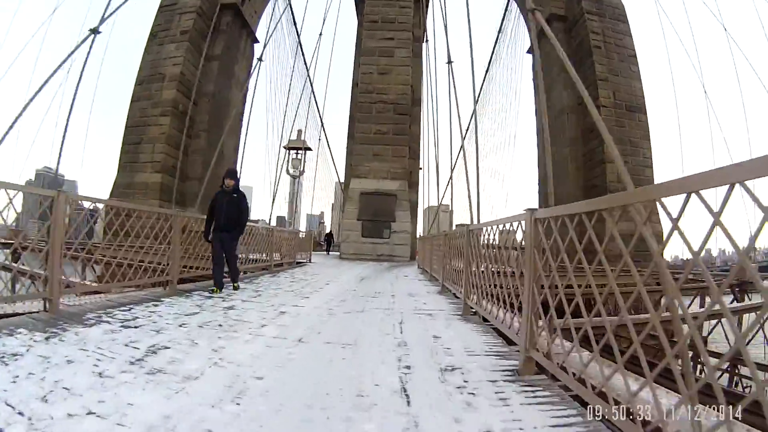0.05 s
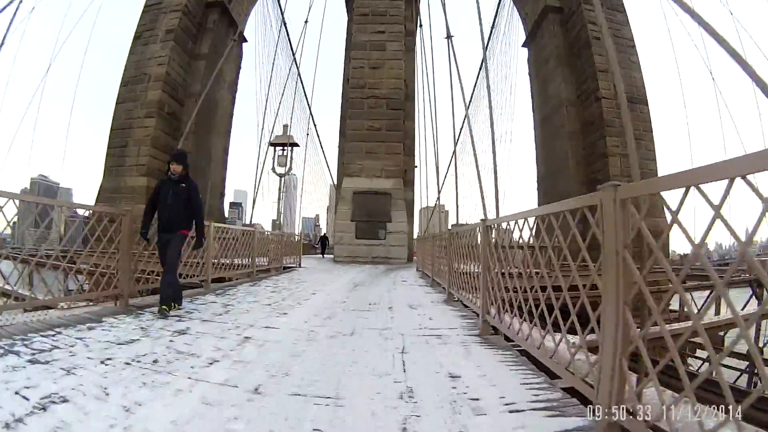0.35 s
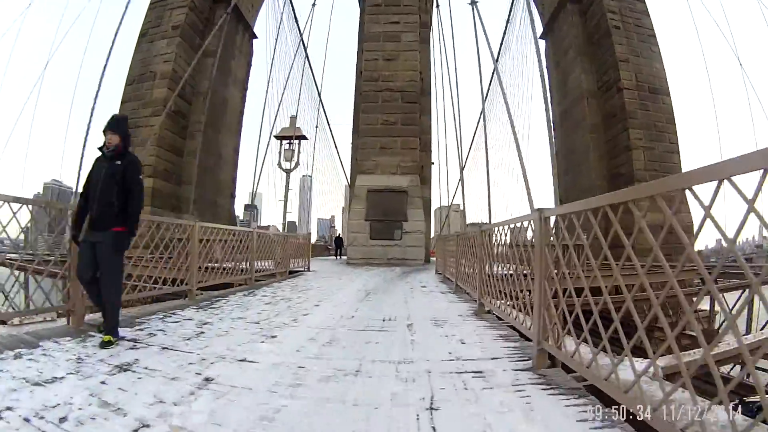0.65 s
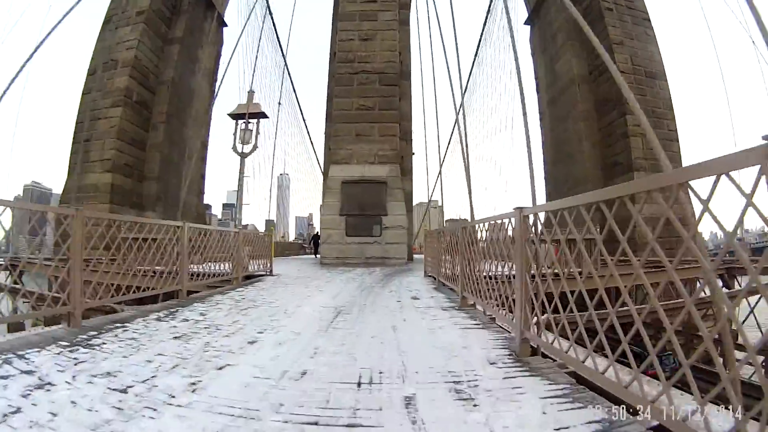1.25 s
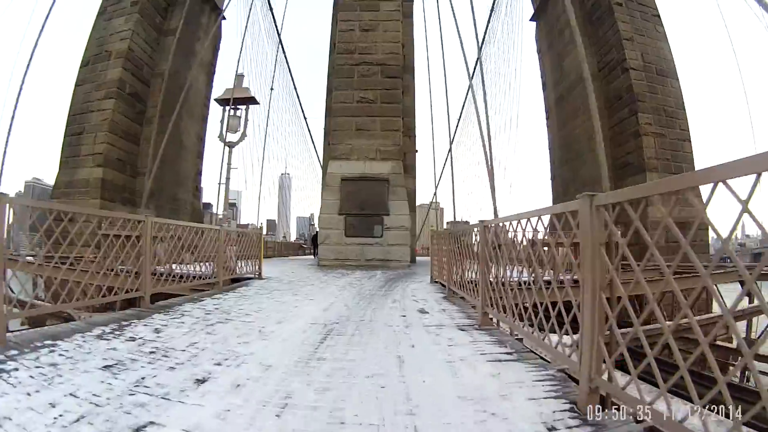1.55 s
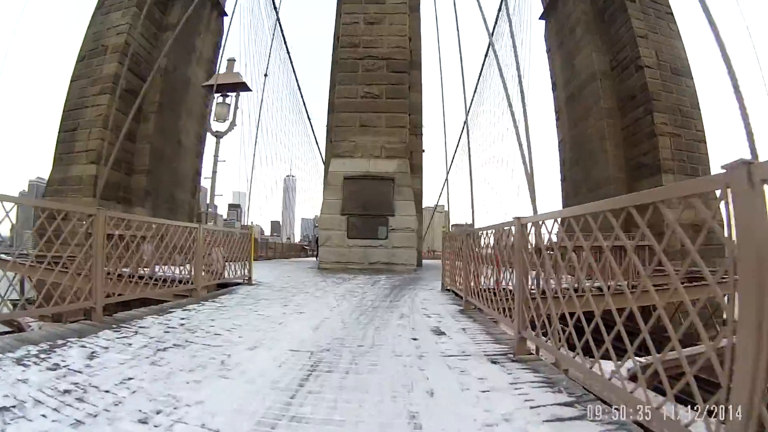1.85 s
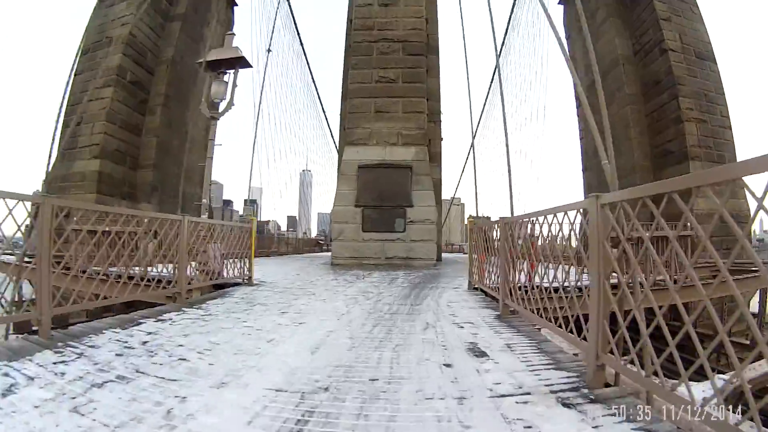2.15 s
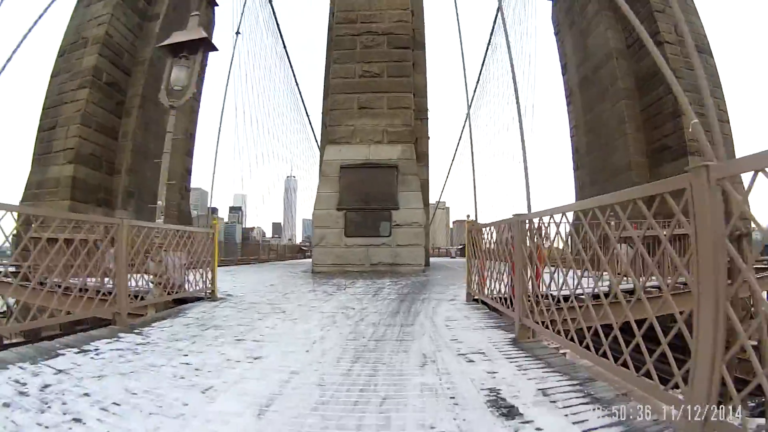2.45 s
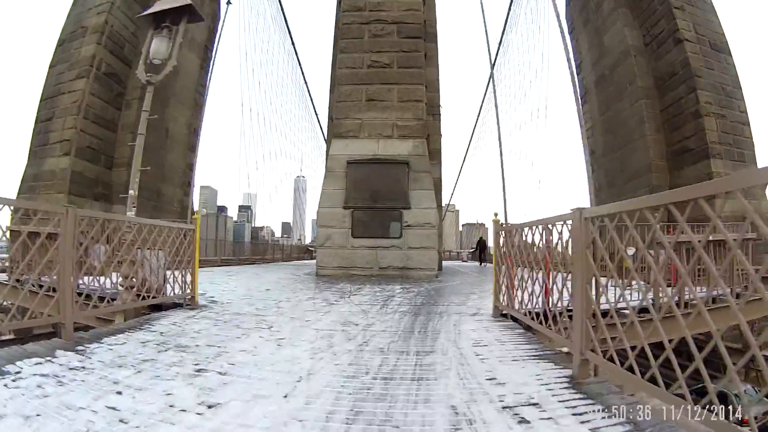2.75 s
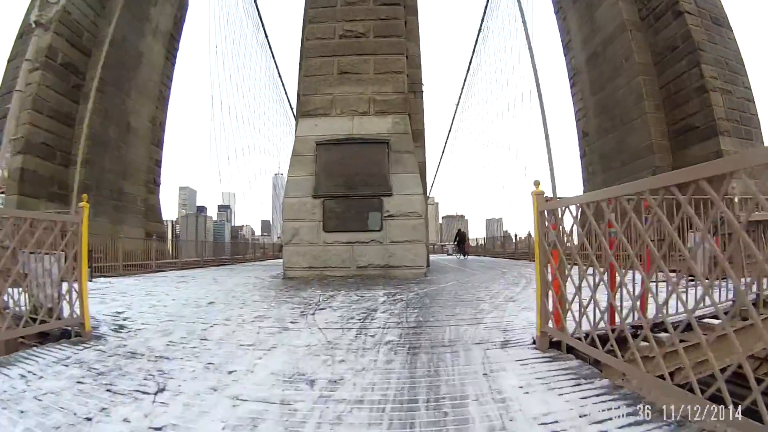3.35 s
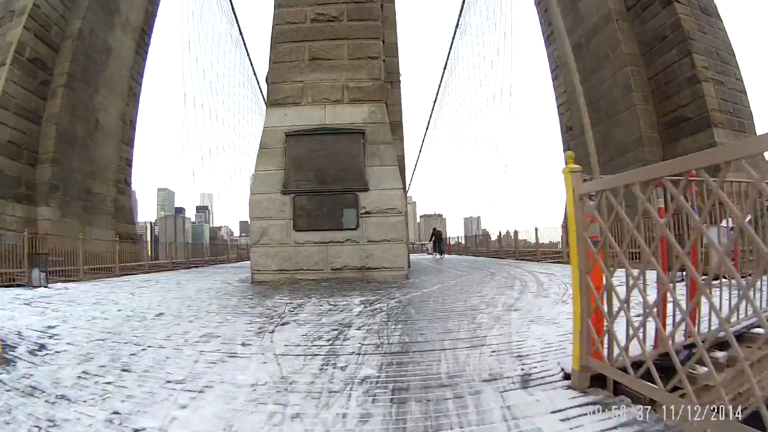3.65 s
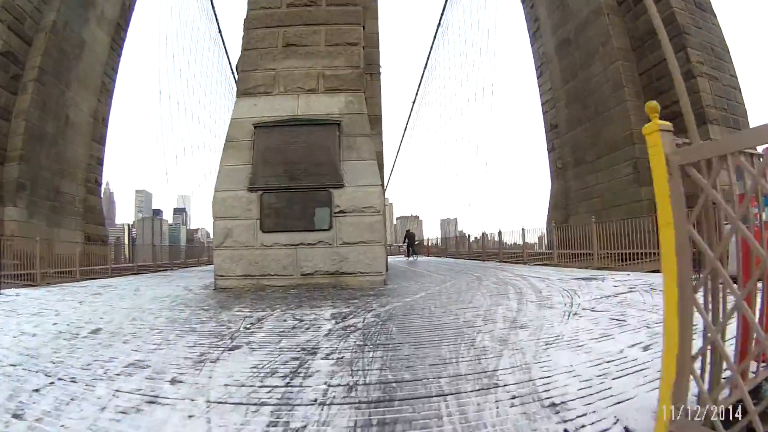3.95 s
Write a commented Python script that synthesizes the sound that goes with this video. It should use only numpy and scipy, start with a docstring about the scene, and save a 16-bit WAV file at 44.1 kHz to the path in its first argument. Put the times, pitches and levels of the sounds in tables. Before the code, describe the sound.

A bicycle rolls over a snowy plank walkway with a low, uneven drone, dull tyre hiss and faint snow ticks. Wind buffets the microphone on the bike twice, with dry pops, sputters and deep thuds.

```python
"""On a snowy plank walkway, a bicycle rolls along with a camera on it.
The planks force the frame to vibrate, and it drones in a few low resonances.
The tyres hiss, and the snow crunches and ticks faintly as it breaks under them.
Turbulence at the microphone makes a deep thud, short sputters, dry pops and two buffeting gusts."""
import sys
import numpy as np
from scipy import signal
from scipy.fft import rfft, irfft
from scipy.io import wavfile
from scipy.ndimage import uniform_filter1d

SR = 44100
rng = np.random.default_rng(int(sys.argv[2]) if len(sys.argv) > 2 else 0)


def generate_wav(signal):
    """Clip the signal to [-1, 1] and save it as 16-bit WAV at the path in sys.argv[1]."""
    frames = np.transpose(np.atleast_2d(signal))
    scaled = np.clip(frames, -1, 1) * 32767
    pcm = np.round(scaled).astype(np.int16)
    wavfile.write(sys.argv[1], SR, pcm)


N = 176400


def amp(db):
    """Decibels to amplitude ratio."""
    return 10 ** (np.asarray(db) / 20)


def unit(x):
    """Normalisation to rms 1."""
    return x / np.sqrt(np.mean(x ** 2) + 1e-20)


def curve(points):
    """Linear interpolation between (time_s, value) points."""
    return np.interp(np.arange(N) / SR, *np.transpose(points))


def colour(x, spectrum):
    """Spectral shaping by (frequency_hz, gain_db) points; rms 1."""
    points_hz, db = np.transpose(spectrum)
    hz = np.fft.rfftfreq(len(x), 1 / SR)
    gain = amp(np.interp(np.log(hz + 1), np.log(points_hz), db))
    return unit(irfft(rfft(x) * gain, len(x)))


def drift(rate_hz):
    """Random modulation: low-passed noise of rms 1."""
    hz = np.fft.rfftfreq(N, 1 / SR)
    return unit(irfft(rfft(rng.standard_normal(N)) * np.exp(-(hz / rate_hz) ** 2), N))


def clicks(per_s, spread_db):
    """A Poisson process: independent impulses of uneven size and sign."""
    impulses = (rng.random(N) < per_s / SR) * rng.choice([-1, 1], N)
    return impulses * amp(spread_db * np.minimum(rng.exponential(1, N), 3))


def add(mix, s, sound):
    """Superposition of a sound on the mix, centred on a time."""
    part = mix[max(round(s * SR) - len(sound) // 2, 0):][:len(sound)]
    part += sound[:len(part)]


def air_band(hz, centre_hz, low_slope, high_slope, top_hz):
    """The broad spectrum of a pressure pulse: two power-law skirts and a steep upper limit."""
    ratio = hz / (1.126 * centre_hz)
    return ratio ** low_slope / (1 + ratio ** (low_slope + high_slope)) / (1 + (hz / top_hz) ** 10)


# Modes of the frame and camera mount: pitch_hz, width_hz, gain_db
FRAME_MODES = [(45.7, 39, -23.5), (70.7, 4, -15.5), (82.2, 6, -10), (118.4, 7.4, -1), (138.8, 15.6, -6.5),
               (221.5, 21.4, -16.5)]
# How hard the planks shake the frame: time_s, level_db
PLANK_DRIVE = [(0.0, -33.5), (0.07, -37), (0.19, -40), (0.21, -36.5), (0.29, -39), (0.36, -35.5),
               (0.46, -35.5), (0.6, -44.5), (0.69, -35.5), (0.78, -41.5), (0.85, -36), (0.92, -38.5),
               (1.07, -39.5), (1.24, -44), (1.27, -37), (1.31, -46), (1.37, -36.5), (1.43, -41),
               (1.45, -38), (1.69, -36.5), (1.71, -43), (1.78, -37), (1.82, -41.5), (1.84, -38.5),
               (2.14, -38.5), (2.21, -48), (2.23, -40), (2.29, -44), (2.32, -35), (2.37, -37), (2.42, -47),
               (2.55, -39.5), (2.58, -37), (2.7, -42), (2.75, -34), (2.82, -48), (2.85, -31), (2.9, -41.5),
               (2.95, -33), (3.0, -41), (3.02, -58), (3.04, -34.5), (3.11, -49), (3.14, -35), (3.16, -41.5),
               (3.29, -37), (3.42, -50), (3.49, -37), (3.58, -39.5), (3.6, -48), (3.71, -36), (3.78, -45),
               (3.8, -36.5), (3.9, -41.5), (3.92, -41.5), (4.0, -34.5)]


def frame(steadiness=0.35):
    """Forced vibration: the planks drive the frame at random, and it responds in its modes."""
    hz, drone = np.fft.fftfreq(N, 1 / SR), np.zeros(N)
    for pitch_hz, width_hz, db in FRAME_MODES:
        detuning = (hz - pitch_hz) / width_hz * 1.075
        ring = np.fft.ifft(np.fft.fft(rng.standard_normal(N)) / (1 + detuning ** 2))
        power = uniform_filter1d(abs(ring) ** 2, size=2000)
        drone += amp(db) * unit(ring.real / power ** steadiness)  # evens out each mode's strength
    return drone * amp(curve(PLANK_DRIVE))


# Spectra of the rolling noise and of the snow's crunch: frequency_hz, gain_db
ROLL_SPECTRUM = [(15, -23.5), (40, -8.5), (100, 1.5), (180, 0.5), (290, 0.5), (450, -6.5), (700, -13.5),
                 (1100, -17.5), (1800, -24), (2600, -31.5), (3500, -39), (3800, -36.5), (4050, -45.5),
                 (5000, -45), (9000, -55.5)]
CRUNCH_SPECTRUM = [(1500, -22.5), (3000, -6.5), (3800, 2.5), (4600, 1.5), (5400, -9), (6250, 1.5),
                   (6800, -18), (7500, 3.5), (8400, -3), (9300, -10.5), (10500, -17.5), (12000, -13.5),
                   (14000, -17.5)]
# Envelopes of the same two sounds: time_s, gain_db
ROLL_ENVELOPE = [(0, 0.5), (.45, -1), (.62, -1), (1.0, -1), (1.4, 0), (2.0, -1.5), (2.6, -2), (3.2, -0.5),
                 (3.6, -1), (4, -2)]
CRUNCH_ENVELOPE = [(0, -72), (.12, -81), (.23, -82), (.36, -87.5), (.55, -83), (.67, -82.5), (.9, -82),
                   (1.0, -76.5), (1.11, -81), (1.2, -85.5), (1.36, -83), (1.62, -86), (1.78, -83.5),
                   (1.87, -82), (1.97, -79.5), (2.1, -81.5), (2.19, -99), (2.45, -83.5), (2.6, -80),
                   (2.77, -80), (2.86, -90), (3.11, -88), (3.17, -78), (3.30, -79), (3.42, -91), (4, -83.5)]


def tyres(roll_db=-49, crunch_db=-0.5):
    """Contact noise: the tread rolls with a dull, lumpy hiss and crushes small clumps of snow."""
    lumps = amp(1.46 * drift(rate_hz=49))
    roll = colour(rng.standard_normal(N) * lumps, ROLL_SPECTRUM)
    clumps = signal.oaconvolve(abs(clicks(per_s=61, spread_db=-0.5)), np.hanning(230))[:N]
    crunch = colour(rng.standard_normal(N) * (.2 + clumps), CRUNCH_SPECTRUM)
    return roll * amp(roll_db + curve(ROLL_ENVELOPE)) + crunch * amp(crunch_db + curve(CRUNCH_ENVELOPE))


# Spectrum of the wind's deep thud: frequency_hz, gain_db
THUD_SPECTRUM = [(12, -6.5), (25, -4), (42, 6), (70, -3), (130, -7), (220, -5), (320, -13.5), (500, -21),
                 (1200, -62.5)]
# Its envelope: time_s, level_db
THUD_ENVELOPE = [(0, -54), (.4, -53), (.95, -58), (1.35, -47.5), (1.55, -50), (1.65, -44), (1.71, -47),
                 (1.77, -53), (1.88, -50), (2.0, -50), (2.1, -52), (2.25, -43), (2.48, -51.5), (2.7, -51.5),
                 (2.85, -42), (2.97, -51), (3.3, -55.5), (3.5, -54), (4, -58.5)]


def wind_thud():
    """Large-scale turbulence: the biggest eddies make the slowest swings of pressure."""
    return colour(rng.standard_normal(N), THUD_SPECTRUM) * amp(curve(THUD_ENVELOPE))


# Quick runs of tiny air pops: middle_s, length_s, level_db, centre_hz
SPUTTER_RUNS = [(0.069, 0.088, -57, 740), (0.435, .2, -63, 552), (1.04, .07, -52, 280),
                (1.538, 0.028, -47.5, 520), (1.634, 0.053, -47.5, 260), (1.648, 0.03, -53, 800),
                (1.742, 0.014, -49.5, 1000), (1.765, 0.018, -52.5, 1000), (1.794, 0.055, -47.5, 220),
                (2.775, .012, -52, 1200), (2.802, 0.018, -59.5, 1500), (2.812, 0.019, -60, 2470),
                (2.826, 0.027, -44.5, 402), (3.144, 0.013, -51, 1000), (3.164, 0.018, -40.5, 1340),
                (3.177, .022, -51, 970), (3.252, .008, -57, 1200), (3.306, 0.029, -56.5, 1920),
                (3.341, 0.045, -59.5, 1070), (3.399, .012, -58.5, 1080), (3.522, 0.01, -50.5, 1090)]
# Spectrum of the stray pops between them: frequency_hz, gain_db
STRAY_SPECTRUM = [(200, -24.5), (700, 10.5), (1500, -5), (2800, -14.5), (4500, -27), (8000, -54.5)]


def sputters(stray_db=-69):
    """Shot noise: dense runs of tiny air pops swell and die, with a few strays between."""
    out, hz = np.zeros(N), np.fft.rfftfreq(4096, 1 / SR)
    crackle = clicks(per_s=2100, spread_db=6.5)
    for middle_s, length_s, db, centre_hz in SPUTTER_RUNS:
        top_hz = min(3740, 3.3 * centre_hz)
        band = air_band(hz, centre_hz, low_slope=0.37, high_slope=1.92, top_hz=top_hz)
        run = irfft(rfft(crackle[int(middle_s * SR):], 4096) * band)[:int(length_s * SR)]
        add(out, middle_s, amp(db) * unit(run * np.hanning(len(run)) ** .5))
    return out + amp(stray_db) * colour(clicks(per_s=45, spread_db=3.5), STRAY_SPECTRUM)


# Ticks of breaking snow crust: middle_s, peak_db, centre_hz
CRUST_TICKS = [(0.036, -57, 6800), (.077, -73, 6400), (.107, -68, 7000), (0.224, -66, 7400),
               (.660, -61, 4800), (0.689, -64, 4000), (.799, -62, 5000), (0.955, -56.5, 3100),
               (0.972, -66.5, 5500), (1.020, -63, 6500), (1.054, -59.5, 6000), (1.087, -66, 6900),
               (1.109, -64, 6500), (1.135, -70, 7500), (1.554, -68.5, 7200), (1.967, -65, 6550),
               (1.984, -67, 6100), (2.090, -67, 7300), (2.561, -68, 5500), (2.621, -63, 5800),
               (2.656, -56.5, 3800), (2.715, -61.5, 5760), (2.788, -62.5, 5970), (2.811, -60, 4250),
               (3.214, -65, 7700), (3.303, -63, 7000), (3.381, -64.5, 5800), (3.685, -61.5, 6060),
               (3.903, -67, 7000)]


def crust(half_length_s=0.0021, log_bandwidth=0.29):
    """Brittle fracture: bits of crust give way under a tyre, each in a burst of bright noise."""
    out, hz = np.zeros(N), np.fft.rfftfreq(1024, 1 / SR)
    t = np.arange(-512, 512) / SR
    for middle_s, db, centre_hz in CRUST_TICKS:
        band = np.exp(-(np.log((hz + 1) / centre_hz) / log_bandwidth) ** 2 / 2) / (1 + (hz / 9000) ** 16)
        burst = rng.standard_normal(len(t)) * np.exp(-(t / half_length_s) ** 2)
        tick = irfft(rfft(burst) * band)
        add(out, middle_s, amp(db) * tick / abs(tick).max())
    return out


# Single pops of air: middle_s, peak_db, centre_hz
AIR_POPS = [(0.072, -34.5, 547), (.077, -34.5, 1220), (0.338, -34, 1020), (.346, -45, 1010),
            (.492, -37.5, 920), (0.836, -44, 1190), (1.194, -37.5, 535), (1.269, -41, 1390),
            (1.430, -40.5, 650), (1.498, -40, 600), (1.516, -46, 600), (1.536, -31.5, 515),
            (1.543, -38, 850), (1.562, -38, 1310), (1.574, -31, 300), (1.588, -34.5, 2130),
            (1.613, -27.5, 524), (1.614, -38, 1970), (1.627, -37, 420), (1.635, -42, 1500),
            (1.64, -28, 400), (1.643, -43, 1900), (1.648, -41, 1000), (1.650, -47, 2180), (1.663, -35, 895),
            (1.739, -34, 600), (1.757, -38, 2300), (1.798, -24.5, 1530), (1.801, -36, 1400),
            (1.939, -38, 640), (2.031, -43, 546), (2.039, -44, 804), (2.224, -32.5, 1010),
            (2.414, -38, 600), (2.737, -43, 900), (2.746, -37, 1060), (2.758, -42.5, 750),
            (2.778, -36, 1310), (2.818, -35, 1470), (2.828, -37, 1100), (2.853, -39, 200),
            (2.929, -41.5, 1400), (2.949, -36, 168), (2.962, -36, 1010), (2.987, -44, 1000),
            (3.16, -37, 2100), (3.167, -37, 2250), (3.170, -27.5, 2000), (3.239, -40, 1100),
            (3.259, -40, 1110), (3.286, -43, 1900), (3.308, -37, 1790), (3.318, -44, 1900),
            (3.341, -45, 2300), (3.35, -46, 800), (3.373, -37, 646), (3.406, -36, 1100),
            (3.527, -33.5, 1170), (3.695, -33, 1610), (3.701, -40, 1350), (3.826, -47, 550)]


def pops():
    """Pressure transients: each eddy snaps at the microphone in one short swing, with no ring."""
    out, hz = np.zeros(N), np.fft.rfftfreq(1024, 1 / SR)
    for middle_s, db, centre_hz in AIR_POPS:
        top_hz = min(3550, 2.32 * centre_hz)
        band = air_band(hz, centre_hz, low_slope=1.34, high_slope=3.85, top_hz=top_hz)
        pop = irfft(band * np.exp(2j * np.pi * rng.random()))  # a random phase varies the pulse's shape
        add(out, middle_s, amp(db) * np.fft.fftshift(pop) / abs(pop).max())
    return out


# Spectrum of the buffeting: frequency_hz, gain_db
GUST_SPECTRUM = [(15, -14.5), (40, -4.5), (120, 1.5), (250, -0.5), (450, -4), (750, -6), (1200, -20.5),
                 (2500, -28.5), (3200, -41), (4000, -51), (7000, -72.5), (12000, -86)]
# Wind strength at the microphone: time_s, level_db
GUST_ENVELOPE = [(0, -69), (.9, -69.5), (1.42, -69), (1.50, -46.5), (1.535, -48.5), (1.60, -45),
                 (1.64, -42.5), (1.665, -45), (1.71, -54), (1.745, -41.5), (1.78, -48.5), (1.83, -57.5),
                 (2.1, -56.5), (2.68, -62.5), (2.76, -45.5), (2.80, -46.5), (2.835, -44), (2.89, -60.5),
                 (2.965, -45.5), (3.03, -72), (3.2, -55), (3.35, -51.5), (3.47, -66), (4, -76)]


def gusts():
    """Turbulent buffeting: lumpy pressure noise rises and falls with the strength of the wind."""
    lumps = amp(2.9 * drift(rate_hz=270))
    return colour(rng.standard_normal(N) * lumps, GUST_SPECTRUM) * amp(curve(GUST_ENVELOPE))


def scene():
    """Superposition: the pressures from bicycle and wind add at one microphone."""
    bicycle = frame() + tyres() + crust()
    wind = gusts() + wind_thud() + pops() + sputters()
    return (bicycle + wind)[None]


def record(dry, hiss_db=-89, whine_db=-99, whine_hz=10519.5, cutoff_hz=12750):
    """Self-noise and band limiting: the camera adds faint hiss and a thin whine, then low-passes."""
    hiss = amp(hiss_db) * rng.standard_normal(N)
    whine = amp(whine_db) * unit(np.sin(2 * np.pi * whine_hz * np.arange(N) / SR))
    low_pass = signal.firwin(511, cutoff_hz, window=("kaiser", 9), fs=SR)
    return signal.oaconvolve(dry + hiss + whine, low_pass[None], "same")


dry = scene()
out = record(dry)
generate_wav(out)
```